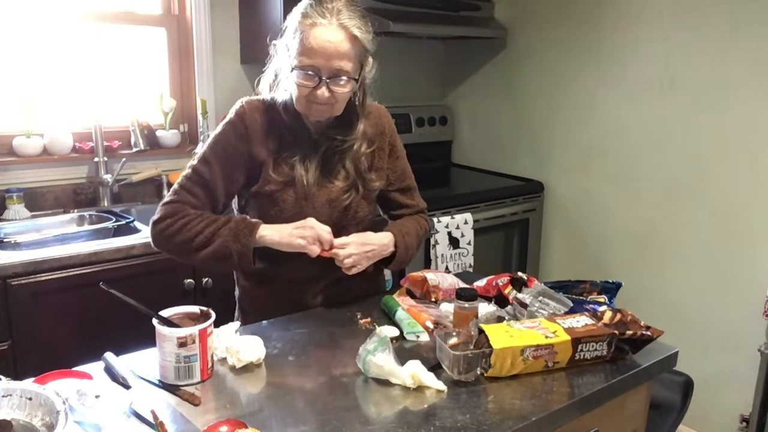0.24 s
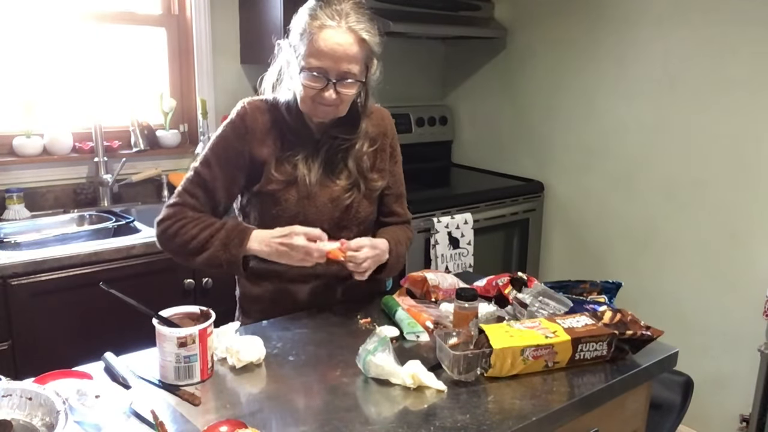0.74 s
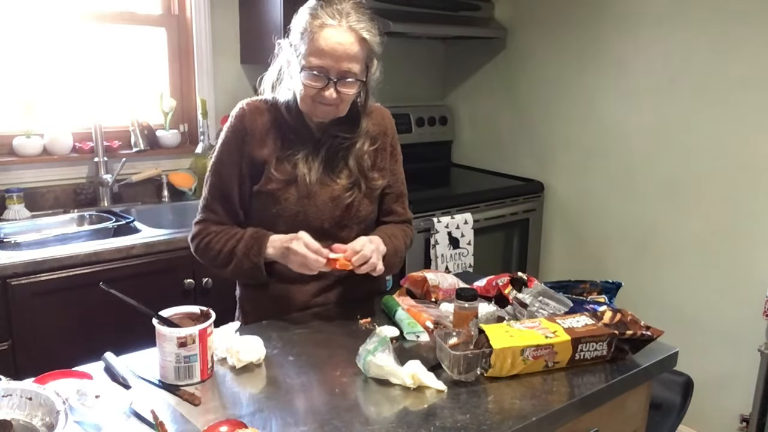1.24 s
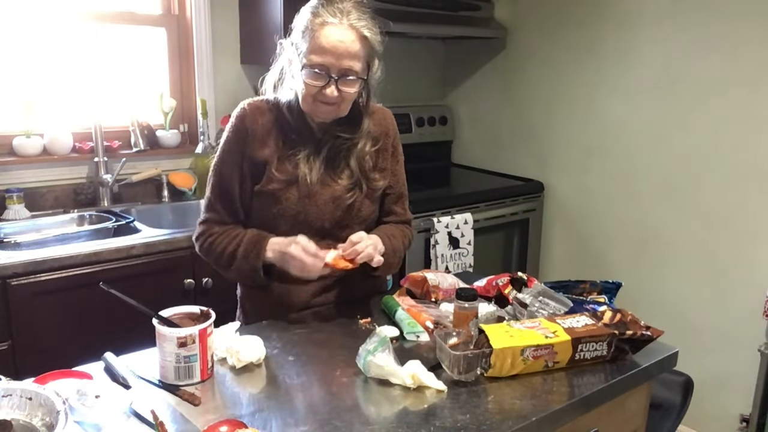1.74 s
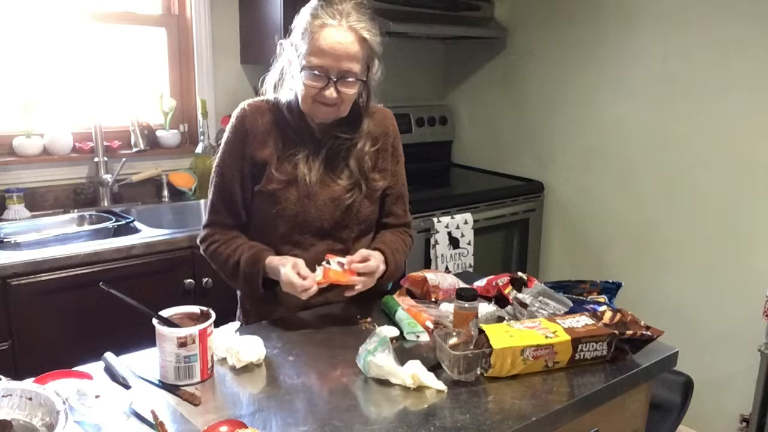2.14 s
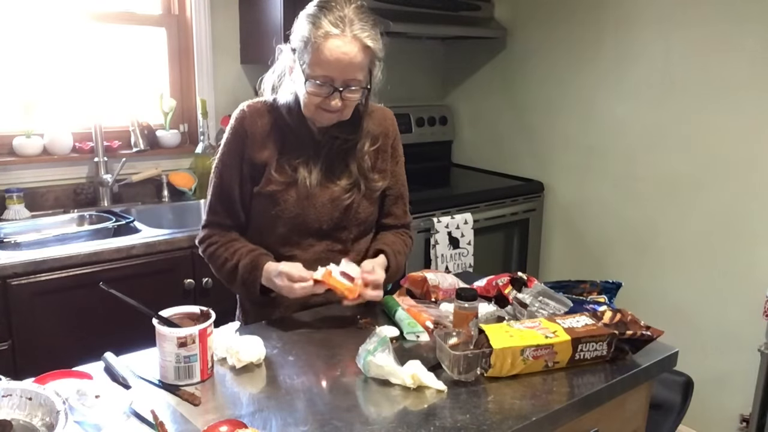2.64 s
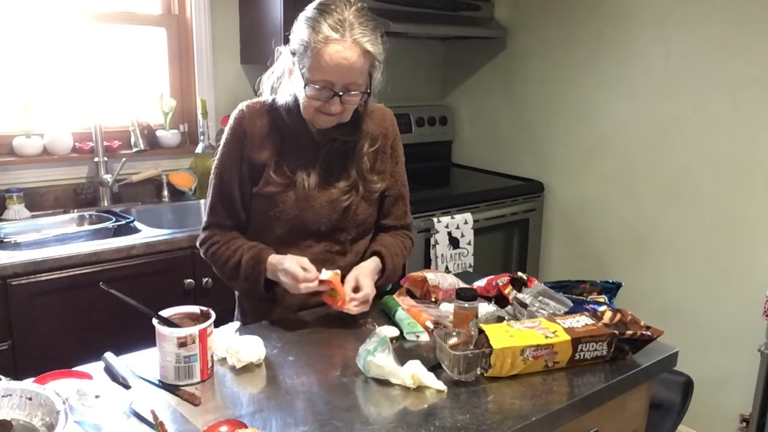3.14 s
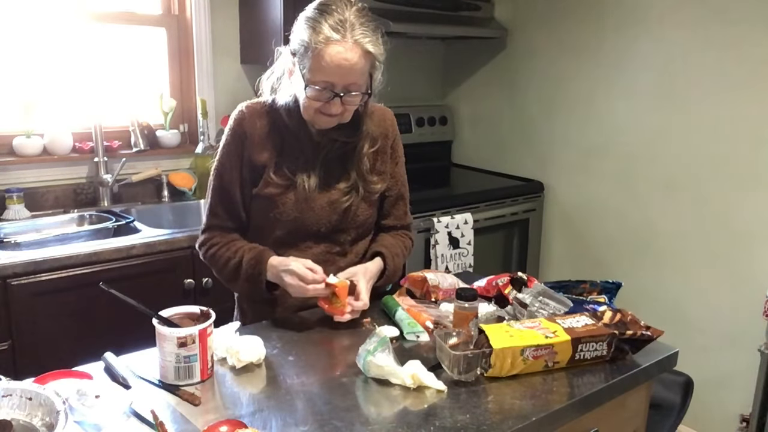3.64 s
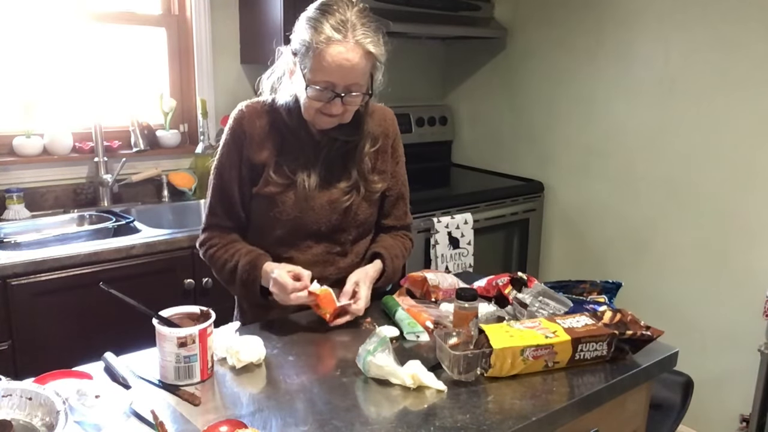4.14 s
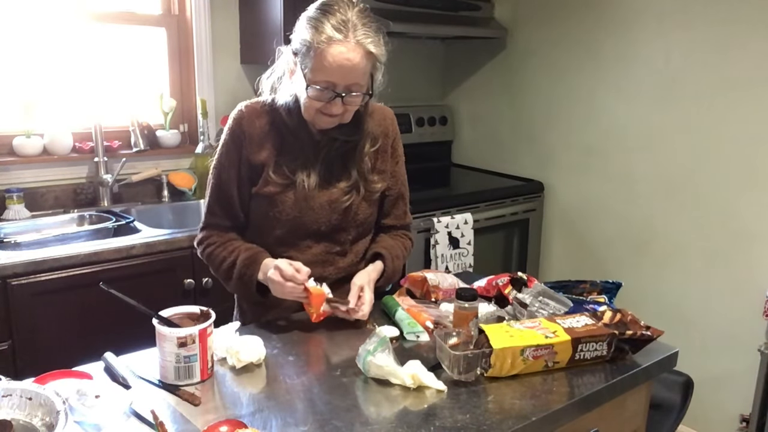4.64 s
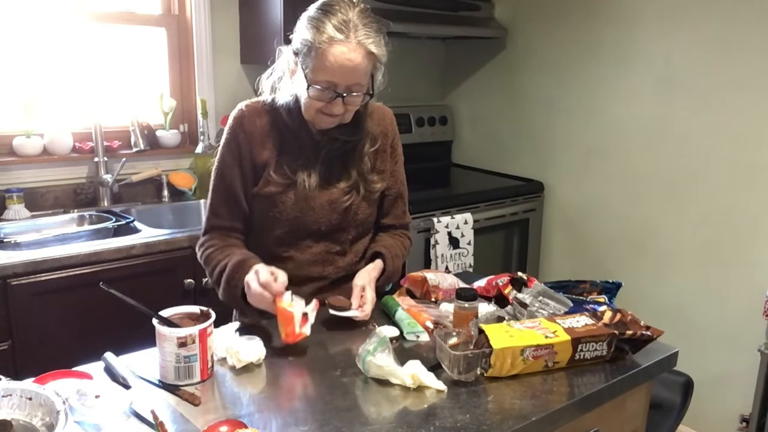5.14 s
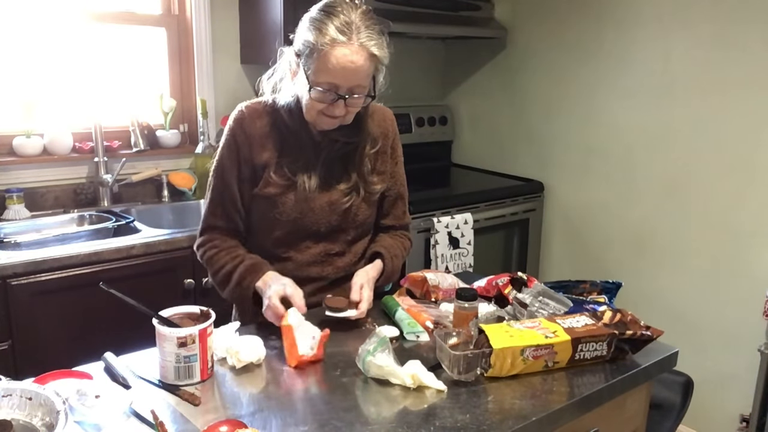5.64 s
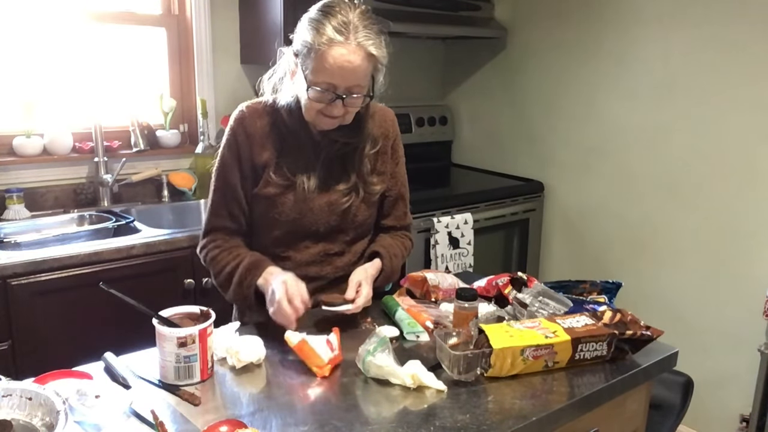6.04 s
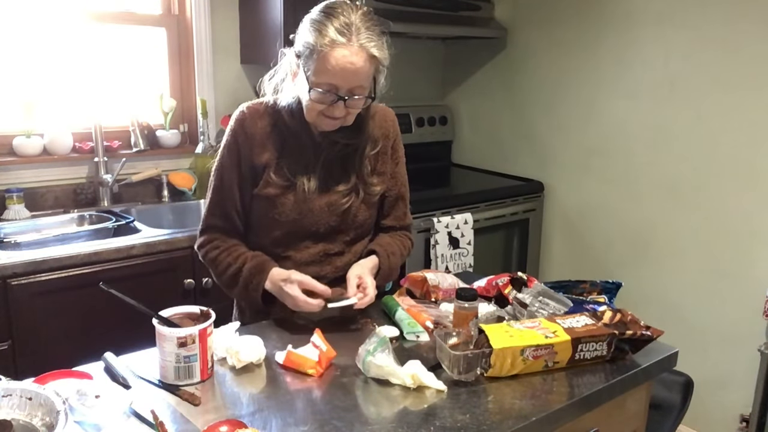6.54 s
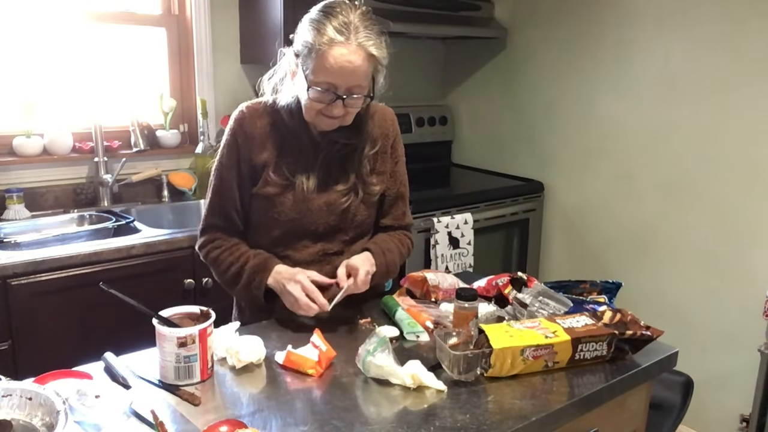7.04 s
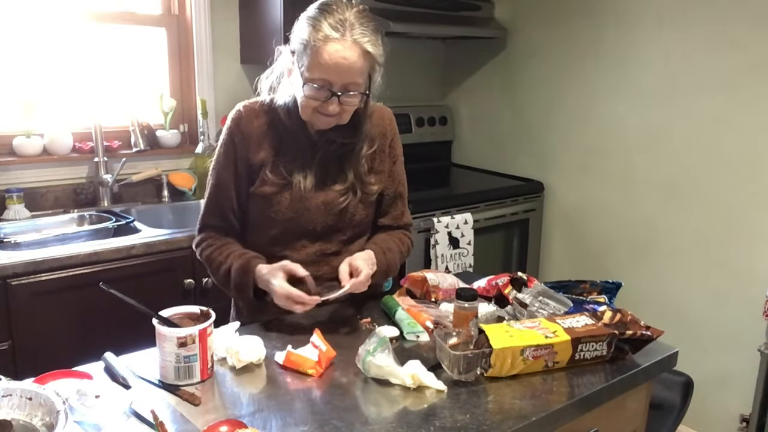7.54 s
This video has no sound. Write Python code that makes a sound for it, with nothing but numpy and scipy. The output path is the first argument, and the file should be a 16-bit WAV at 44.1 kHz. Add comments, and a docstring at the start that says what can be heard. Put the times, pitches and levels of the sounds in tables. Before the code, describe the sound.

Fingers peel open a thin, stiff candy wrapper in a quiet kitchen. It crinkles and rubs in short irregular bursts, with sharp little snaps as the creases buckle, busiest in the first few seconds. The crackles then grow softer and sparser as the wrapper is put down, with one more small flurry near the end. The microphone picks up a slight room echo and a faint appliance hum.

```python
"""Peeling a candy wrapper

A thin, stiff wrapper is peeled open by hand in a quiet kitchen, then laid on the counter. Creases buckle with
sharp snaps that ring the film; in between, it crinkles and rubs under the fingers. The room echoes. Behind it
are soft swells, a rasp, a thin scrape, a brief tone and a low hum."""
import sys
import numpy as np
from scipy import signal
from scipy.fft import rfft, irfft, next_fast_len
from scipy.io import wavfile
from scipy.ndimage import uniform_filter1d, map_coordinates

SR = 44100
rng = np.random.default_rng(int(sys.argv[2]) if len(sys.argv) > 2 else 0)


def dump_mix(stems):
    """Bounce the given channels to the path in sys.argv[1] as a 16-bit WAV at rate SR."""
    frames = np.atleast_2d(stems).T  # one column per channel
    limited = np.clip(frames, -1, 1)  # hard clip at full scale
    pcm = np.round(limited * 32767).astype(np.int16)
    wavfile.write(sys.argv[1], SR, pcm)


N = 344068

# creases that snap loudly, with levels relative to the other snaps:
# (time [s], body [dB], ring [dB], crack [dB], ring pitch [Hz], crack pitch [Hz])
LOUD_SNAPS = [(.0594, -49, -47, -52, 4160, 7100), (.077, -52.5, -45.5, -56, 3680, 9400),
              (.1577, -62, -51, -48, 3800, 6460), (.2638, -48, -42, -46.5, 4340, 6800),
              (.3423, -62, -55, -38.5, 3840, 12350), (.3803, -50, -32, -42.5, 3700, 9200),
              (.3936, -48, -43, -58, 3740, 9600), (.4085, -66, -45, -50, 4130, 12300),
              (.428, -41, -34.5, -37, 3960, 13800), (.4815, -48.5, -31.5, -35.5, 4070, 10900),
              (.6574, -48.5, -39.5, -41, 4280, 10100), (.7047, -50.5, -38.5, -51, 4050, 6900),
              (.7322, -59, -47.5, -44, 3350, 14100), (.8568, -50.5, -49.5, -56.5, 3650, 7500),
              (.9179, -59, -46, -39, 3800, 12900), (.991, -66, -41.5, -46.5, 4450, 8600),
              (1.002, -65, -46, -49, 3600, 8300), (1.1404, -57, -32, -38, 3970, 9200),
              (1.1862, -66, -43, -41, 4730, 7140), (1.282, -53, -29.5, -45.5, 4140, 12700),
              (1.3425, -56, -44, -51, 4390, 7300), (1.3614, -46.5, -38, -38, 3680, 7500),
              (1.3811, -54, -41, -35.5, 4380, 7240), (1.4324, -69, -44, -44, 4360, 7100),
              (1.455, -72, -48, -44.5, 4770, 7200), (1.5202, -51.5, -38, -37.5, 3830, 7500),
              (1.564, -72, -52, -42.5, 3900, 7800), (1.6457, -31, -17, -25.5, 3880, 7540),
              (1.6932, -53, -41, -40, 3680, 8750), (1.7144, -68, -31, -42, 3810, 14200),
              (1.8304, -67, -39, -61, 3570, 8400), (1.9965, -53, -42.5, -46, 5030, 7300),
              (2.0029, -49.5, -32.5, -41, 3930, 7460), (2.0364, -49, -38, -47, 4040, 7500),
              (2.0407, -60, -35, -34.5, 4220, 8250), (2.0648, -46, -46, -42, 3530, 8100),
              (2.0749, -41, -39, -40, 3700, 9100), (2.23, -54, -27.5, -32, 4470, 12100),
              (2.2375, -52, -36, -35, 4900, 7500), (2.2465, -45, -41, -39, 4300, 9000),
              (2.257, -47, -33, -39, 3700, 8100), (2.2615, -41, -33, -38.5, 4200, 7000),
              (2.279, -48, -40, -52, 3630, 10800), (2.3244, -48.5, -32.5, -37, 3740, 7900),
              (2.3639, -56, -46, -43.5, 4700, 6200), (2.4018, -55, -46, -52, 3500, 7600),
              (2.4114, -54, -37, -55, 4500, 11800), (2.5963, -52.5, -31, -41.5, 4700, 11500),
              (2.6642, -52.5, -41.5, -58, 3780, 7800), (2.8873, -44.5, -40, -42.5, 4310, 14400),
              (3.0564, -52.5, -47.5, -47, 3890, 12700), (3.1209, -46.5, -46, -48, 3370, 6400),
              (3.1364, -62, -46, -49, 5050, 9600), (3.1588, -51, -52, -47, 3570, 9500),
              (3.3498, -57.5, -49, -45, 4400, 7560), (3.3986, -49.5, -42, -48, 3810, 6530),
              (3.5373, -62, -40, -43.5, 3550, 6750), (3.6124, -45.5, -37, -43, 4540, 12200),
              (3.6853, -47, -48, -43.5, 4400, 6850), (3.8026, -61, -41.5, -42.5, 3240, 8200),
              (3.9246, -47.5, -43, -45.5, 5000, 7100), (4.0255, -51.5, -51, -72, 4090, 8400),
              (4.0666, -53.5, -50, -63, 3710, 7100), (4.1387, -59, -46, -57, 4050, 13700),
              (4.195, -52.5, -47.5, -44, 4070, 9600), (4.287, -48.5, -43, -45, 3450, 7800),
              (4.5728, -46, -56, -36.5, 4650, 12100), (4.6334, -45.5, -39, -37, 3400, 11300),
              (5.0766, -61.5, -62, -61.5, 3640, 6900), (5.1792, -69, -62, -58, 4030, 10800),
              (5.2503, -54, -54, -55.5, 4430, 7300), (5.2574, -53, -40, -55, 3930, 7300),
              (5.3568, -47.5, -45, -62, 3340, 12400), (5.5478, -58, -50.5, -51, 4810, 7240),
              (5.6626, -59, -51.5, -54, 4430, 14100), (6.1596, -59.5, -49, -48, 4670, 10600),
              (6.171, -69, -63, -53.5, 4600, 10500), (6.4005, -65, -61, -54.5, 4370, 12600),
              (6.4527, -63, -52.5, -47.5, 4490, 8400), (6.6095, -58.5, -41, -42.5, 5420, 6400),
              (7.0953, -74, -59, -57, 4650, 6400), (7.1209, -65, -55, -54, 4770, 13600),
              (7.1653, -57, -44, -45.5, 4590, 6300), (7.2673, -51.5, -41, -51, 3370, 11300),
              (7.279, -70, -54, -42, 3690, 6300), (7.306, -48.5, -37, -37, 3970, 10100)]
# each pull of the fingers: (start [s], rise [s], hold [s], crinkle strength [dB], rub strength [dB])
FINGER_PULLS = [(0.263, 0.091, 0.14, -46, -50.5), (0.629, 0.026, 0.013, -53.5, -62),
                (0.892, 0.037, 0.066, -57, -68), (1.248, 0.14, .015, -48.5, -54.5),
                (1.497, .03, 0.092, -52.5, -70), (1.636, 0.021, 0.017, -38.5, -42),
                (1.786, 0.032, 0.065, -55, -63), (1.971, 0.058, 0.034, -46, -50),
                (2.215, 0.019, 0.019, -36.5, -43.5), (2.38, 0.026, .005, -58, -54.5),
                (2.531, 0.064, 0.072, -55.5, -56.5), (2.833, 0.053, .01, -50.5, -49.5),
                (3.06, 0.074, 0.053, -49.5, -54), (3.36, 0.032, 0.022, -56.5, -53.5),
                (3.562, 0.026, .005, -49.5, -56), (3.649, 0.036, .005, -53, -53),
                (3.792, 0.022, 0.065, -54.5, -56.5), (3.868, 0.056, 0.036, -53.5, -53.5),
                (4.378, 0.036, 0.093, -53, -53.5), (4.535, 0.028, .002, -44.5, -46),
                (4.829, 0.018, 0.0027, -55, -57), (5.242, .015, .015, -57.5, -72),
                (5.343, 0.015, .005, -57.5, -61), (5.535, .02, 0.098, -64.5, -71),
                (5.705, 0.033, 0.018, -58.5, -58.5), (6.154, 0.0098, .003, -59, -71.5),
                (6.38, 0.068, 0.029, -64, -67), (6.6, 0.0072, .003, -55, -77),
                (6.713, 0.048, .005, -62.5, -68.5), (6.925, 0.019, 0.0034, -57.5, -65),
                (7.144, 0.012, .003, -55, -83), (7.267, 0.041, 0.027, -50, -55.5),
                (7.499, 0.05, 0.032, -61.5, -63.5), (7.732, 0.03, .02, -65, -75)]
# the faint stirring of the held film between pulls: (time [s], crinkle strength [dB])
GRIP_STRENGTH = [(0, -61), (.8, -65.5), (1.25, -57.5), (1.7, -57.5), (2, -63.5), (2.85, -68), (3.25, -58),
                 (3.5, -64.5), (4.25, -58.5), (4.55, -64), (4.8, -74), (7.8, -80)]
# the tone color of each sound the film makes: (frequency [Hz], gain [dB])
BODY_COLOR = [(100, -27.5), (250, -18), (400, -2), (650, -3.5), (1000, 5), (1350, 1), (1600, -5),
              (2000, 4.5), (2500, -6), (4000, -42)]
RING_COLOR = [(2000, -0.5), (2750, 2), (3250, 5), (3600, -2), (4300, 2), (5000, -5.5), (6500, 5)]
CRACK_COLOR = [(2000, -53), (4500, -10), (5600, 1.5), (7000, 2.5), (9000, 4), (12000, 0), (14500, -0.5),
               (16000, -15)]
CRINKLE_COLOR = [(300, -43), (1600, -5.5), (2500, -4), (3200, 4.5), (4200, -2), (5000, -0.5), (8500, 0),
                 (12500, -1.5), (16000, -12)]
RUB_COLOR = [(100, -17.5), (250, -7), (450, -4), (1000, 3), (1600, 4), (2200, 2.5), (3500, -14.5),
             (8000, -43)]
# echoes from nearby surfaces: (delay [s], relative level [dB])
WALL_ECHOES = [(.0036, -16.5), (.0082, -30), (0.011, -12), (0.0132, -12.5), (.0172, -34), (.0245, -33)]
# how long the kitchen rings: (frequency [Hz], time to fade by 60 dB [s])
ROOM_DECAY = [(200, 0.81), (1000, 0.29), (4000, 0.37), (9000, 0.3), (16000, 0.17)]
# soft low swells, a short rasp and a thin scrape:
# (time [s], pitch [Hz], band width [Hz], level [dB], rise [s], time to fade by 60 dB [s])
SWELLS_AND_SCRAPES = [(1.446, 90, 89.5, -55.5, 0.019, 0.69), (1.461, 254, 50, -60.5, 0.027, 0.46),
                      (3.998, 412, 130, -54.5, 0.018, 0.47), (4.012, 730, 80, -55.5, 0.013, 0.2),
                      (4.046, 248, 50, -57, 0.028, 0.11), (3.99, 5100, 300, -58.5, 0.055, .7),
                      (4.448, 745, 805, -50.5, 0.018, 0.3)]
# the tone color of the still room: (frequency [Hz], gain [dB])
AIR_COLOR = [(20, -15), (36, -27), (58, -1.5), (80, -1.5), (125, 2), (200, -1.5), (330, -9), (600, -12.5),
             (1500, -14.5), (4000, -19), (9000, -21.5), (13500, -27), (16000, -40)]

TOP_HZ = 15900  # the highest frequency heard


def snaps(creases, size=1024):
    """Each crease pushes the whole sheet, rings one facet (a stiff, flat patch) and gives a high crack."""
    sheet, facets = np.zeros(N), np.zeros(N)
    t = np.arange(size) / SR
    burst = np.sqrt(0.0035 * SR / size)  # scales each snap to the energy of a 3.5 ms burst
    for start, body_db, ring_db, crack_db, ring_hz, crack_hz in creases:
        kicks = buckle(t, run_s=0.0018, slip_db=-19)
        body = unit(colored(kicks, BODY_COLOR))
        ring = unit(facet_ring(colored(kicks, RING_COLOR), ring_hz, width_hz=1740))
        sharp_kicks = kicks + 1.2 * resonate(kicks, crack_hz, width_hz=750)
        crack = unit(colored(sharp_kicks, CRACK_COLOR))
        add(sheet, start, burst * (amp(body_db + 2.35) * body + amp(crack_db + 0.96) * crack))
        add(facets, start, burst * amp(ring_db - 1.74) * ring)
    return sheet, facets


def buckle(t, run_s, slip_db, count=14, slip_fade_s=0.029):
    """A crease gives way: a first kick, a quick run of smaller ones, and a short fizz of slipping film."""
    kicks = np.zeros(len(t))
    places = (rng.random(count) * run_s * SR).astype(int)
    np.add.at(kicks, places, rng.normal(0, 0.59, count))
    kicks[0] = 1
    kicks += amp(slip_db - 60 * t / slip_fade_s) * rng.standard_normal(len(t))
    # even out the energy from low to high, so that the film alone gives the color
    power = uniform_filter1d(np.abs(rfft(kicks)) ** 2, 11)
    hz = np.fft.rfftfreq(len(t), 1 / SR)
    return colored(kicks, np.column_stack([hz, -10 * np.log10(power)]))


def facet_ring(x, hz, width_hz):
    """A stiff facet of film rings briefly in one broad band."""
    edges = np.clip([hz - width_hz / 2, hz + width_hz / 2], 100, SR / 2 - 100)
    return signal.sosfilt(signal.butter(3, edges, "bandpass", fs=SR, output="sos"), x)


def small_snaps(crinkle, count=48, peeling_s=4.6, ring_hz=3940, crack_hz=8100):
    """Small creases give way by chance, louder under a harder pull; returns rows like LOUD_SNAPS."""
    times = (np.arange(count) + rng.random(count)) * peeling_s / count
    effort_db = np.minimum(20 * np.log10(crinkle[(times * SR).astype(int)]), -54)
    scatter_db = 2 * rng.standard_normal((count, 3))
    levels = effort_db[:, None] + (-6.5, 3, 1) + scatter_db  # body, ring, crack
    octaves = 0.14 * rng.standard_normal((count, 2))
    pitches = 2 ** octaves * [ring_hz, crack_hz]
    return np.column_stack([times, levels, np.minimum(pitches, TOP_HZ)])


def fingers(grip_rub_db=-5, release_db_per_s=199):
    """Pulls build, hold and let go on top of a light grip; returns crinkle and rub strength over time."""
    grip_times, grip_levels = np.transpose(GRIP_STRENGTH)
    grip_db = np.interp(np.arange(N) / SR, grip_times, grip_levels)
    crinkle_power = amp(grip_db) ** 2
    rub_power = amp(grip_db + grip_rub_db) ** 2
    t = np.arange(SR) / SR
    for start, rise, hold, crinkle_db, rub_db in FINGER_PULLS:
        settling = amp(-release_db_per_s * np.maximum(t - rise - hold, 0))
        pull = np.minimum(t / rise, 1) ** 1.06 * settling
        add(crinkle_power, start, (amp(crinkle_db) * pull) ** 2)
        add(rub_power, start, (amp(rub_db) * pull) ** 2)
    return np.sqrt(crinkle_power), np.sqrt(rub_power)


def crinkling(crinkle, rub):
    """Wrinkles crackle and tick as the fingers pull; the same crackle is duller where the film rubs."""
    crackle = wrinkles(per_second=420, spread_db=4.5, life_s=0.0007, hiss_db=-4)
    crackle = shifting_folds(crackle, depth_db=2.6)
    ticks = facet_ticks(per_second=330, hz=4900, octaves=1.4, cycles=2.6, spread_db=5.5)
    bright = unit(unit(colored(crackle, CRINKLE_COLOR)) + 0.7 * ticks)
    dull = unit(colored(crackle, RUB_COLOR))
    return amp(-0.5) * crinkle * bright + amp(-3) * rub * dull


def wrinkles(per_second, spread_db, life_s, hiss_db):
    """Tiny buckles at random moments, mostly small and a few large, over a smooth sliding hiss."""
    sizes = amp(spread_db * np.minimum(rng.exponential(size=N), 3))
    kicks = (rng.random(N) < per_second / SR) * sizes
    power = signal.lfilter([1], [1, -np.exp(-1 / (life_s * SR))], kicks ** 2)  # each kick dies away
    loudness = np.sqrt(power / power.mean() + amp(hiss_db) ** 2)
    return unit(loudness * rng.standard_normal(N))


def shifting_folds(x, depth_db, smoothing=7):
    """The tone color drifts as the folds change shape."""
    spectra = signal.stft(x, nperseg=512)[2]
    drift = uniform_filter1d(rng.standard_normal(spectra.shape), smoothing, axis=0)  # across frequency
    drift = uniform_filter1d(drift, smoothing, axis=1)  # across time
    return signal.istft(spectra * amp(depth_db * unit(drift)), nperseg=512)[1][:N]


def facet_ticks(per_second, hz, octaves, cycles, spread_db, size=300):
    """Tiny facets flip at random moments, each ringing for a few cycles at its own pitch."""
    count = round(per_second * N / SR)
    when, up, down, strength = np.hsplit(rng.random((count, 4)), 4)
    pitch = np.minimum(hz * 2 ** (octaves * (up - down)), TOP_HZ)
    gain = amp(spread_db * np.minimum(-np.log(1 - strength), 2))
    gain *= np.sqrt(np.minimum(pitch / hz, 1))  # low ticks are softer
    turns = pitch * np.arange(size) / SR
    rings = gain * np.sin(2 * np.pi * turns) * np.exp(-turns / cycles) * (1 - np.exp(-turns))
    places = (when * (N - size)).astype(int) + np.arange(size)
    return unit(np.bincount(places.ravel(), rings.ravel(), N))


def kitchen_echo(x, tail_db, walls_db, pieces=52):
    """Short echoes from nearby surfaces and a fading room tail, varied at random from moment to moment."""
    echo = np.zeros(N)
    for part in np.array_split(np.arange(N), pieces):
        start = part[0] / SR
        for delay, db in WALL_ECHOES:
            arrival = start + delay * (1 + 0.04 * rng.standard_normal())
            add(echo, arrival, amp(db + walls_db) * x[part])
        add(echo, start, amp(tail_db) * signal.fftconvolve(x[part], room_tail(build_s=0.00033)))
    return echo


def room_tail(build_s):
    """Many echoes blur into one fading tail whose highest sounds die first."""
    hz, t, spectra = signal.stft(rng.standard_normal(SR // 2), SR, nperseg=256)
    fade = amp(-60 * t / look_up(ROOM_DECAY, hz)[:, None])
    tail = signal.istft(spectra * fade, SR, nperseg=256)[1]
    tail *= 1 - np.exp(-np.arange(len(tail)) / (build_s * SR))
    return tail / np.linalg.norm(tail)


def swells_and_scrapes():
    """Soft low swells, a short rasp and a thin scrape: each is a band of noise that rises and fades."""
    track = np.zeros(N)
    t = np.arange(SR // 2) / SR
    for start, hz, width_hz, db, rise, fade_s in SWELLS_AND_SCRAPES:
        band = resonate(rng.standard_normal(len(t)), hz, width_hz)
        band = unit(resonate(band, hz, 2 * width_hz))
        swell = np.minimum(t / rise, 1) * amp(db - 60 * np.maximum(t - rise, 0) / fade_s)
        add(track, start, band * swell)
    return track


def low_tone(start_s=3.935, length_s=0.275, rise_s=0.023, hz=283, db=-57, fade_db_per_s=24):
    """A faint low tone wavers for a moment and fades."""
    t = np.arange(N) / SR - start_s
    on_off = np.clip(np.minimum(t, length_s - t) / rise_s, 0, 1)
    pitch = hz * (1 + 0.038 * wobble(80))
    phase = 2 * np.pi * np.cumsum(pitch) / SR
    level_db = db - fade_db_per_s * np.maximum(t, 0) + 2.4 * wobble(60)
    return on_off * amp(level_db) * unit(np.sin(phase))


def air_and_hum(air_db=-64, hum_hz=155.3, hum_db=-72.5, waver_db=1.5):
    """Steady air noise and a low hum whose level wavers."""
    air = amp(air_db) * unit(colored(rng.standard_normal(N), AIR_COLOR))
    phase = 2 * np.pi * hum_hz * np.arange(N) / SR + 0.4 * wobble(11)
    hum = amp(hum_db + waver_db * wobble(4)) * unit(np.sin(phase))
    return air + hum


def amp(db):
    """Turn decibels into a number to multiply by."""
    return 10 ** (np.asarray(db) / 20)


def unit(x):
    """Scale a sound to an average power of 1."""
    return x / np.sqrt(np.mean(x ** 2) + 1e-20)


def look_up(points, hz):
    """Read between the rows of a (frequency, value) table, with octaves evenly spaced."""
    frequencies, values = np.transpose(points)
    return np.interp(np.log(hz + 1), np.log(frequencies + 1), values)


def wobble(per_second):
    """A smooth curve through random points."""
    points = rng.standard_normal(int(N * per_second / SR) + 4)
    return map_coordinates(points, [np.arange(N) * per_second / SR])


def colored(x, color):
    """Filter a sound with a table of (frequency [Hz], gain [dB])."""
    size = 2 * next_fast_len(len(x))
    gains = amp(look_up(color, np.fft.rfftfreq(size, 1 / SR)))
    shape = irfft(np.log(gains))
    # fold the shape forward in time, so nothing rings before the sound arrives
    shape[1:size // 2] *= 2
    shape[size // 2 + 1:] = 0
    return irfft(rfft(x, size) * np.exp(rfft(shape)))[:len(x)]


def resonate(x, hz, width_hz):
    """Let a sound ring around one pitch."""
    return signal.lfilter(*signal.iirpeak(hz, hz / width_hz, SR), x)


def add(track, start_s, sound):
    """Mix a sound into the track at the given time."""
    part = track[max(round(start_s * SR), 0):][:len(sound)]
    part += sound[:len(part)]


def scene():
    """The wrapper in the kitchen, on one channel."""
    crinkle, rub = fingers()
    sheet, facets = snaps(np.vstack([LOUD_SNAPS, small_snaps(crinkle)]))
    sheet += crinkling(crinkle, rub)
    # the flat facets aim their sound forward, so less of it stirs the room
    echo = kitchen_echo(sheet + amp(-3) * facets, tail_db=-5, walls_db=-4.5)
    return (sheet + facets + echo + swells_and_scrapes() + low_tone() + air_and_hum())[None]


def record(dry):
    """Cut the deep bass and everything above TOP_HZ."""
    thin = signal.sosfilt(signal.butter(4, 46, "highpass", fs=SR, output="sos"), dry)
    size = next_fast_len(N + SR // 2)
    below_top = np.fft.rfftfreq(size, 1 / SR) < TOP_HZ
    return irfft(rfft(thin, size) * below_top, size)[:, :N]


dry = scene()
out = record(dry)
dump_mix(out)
```